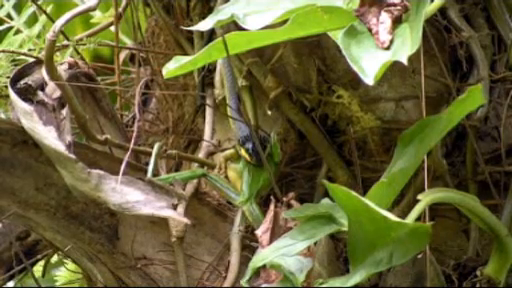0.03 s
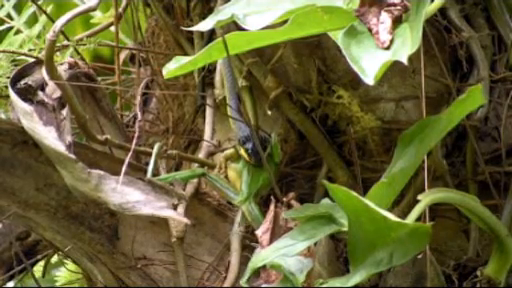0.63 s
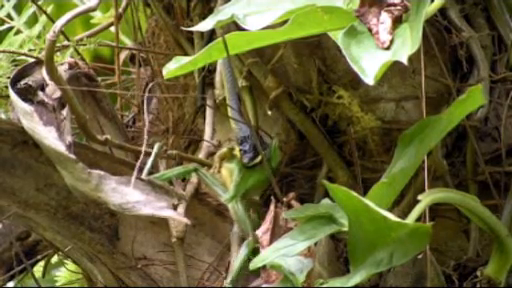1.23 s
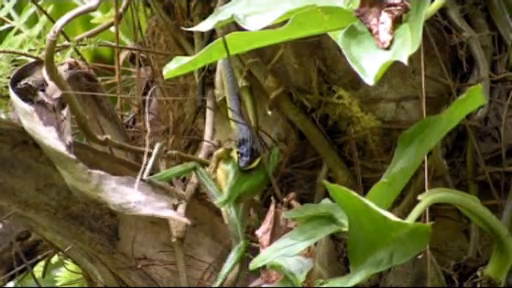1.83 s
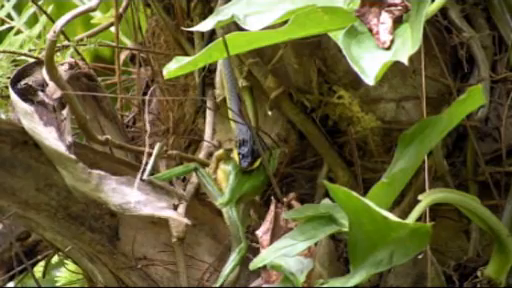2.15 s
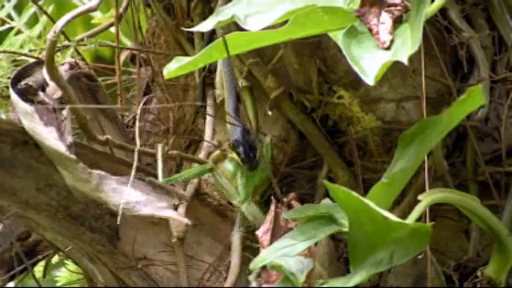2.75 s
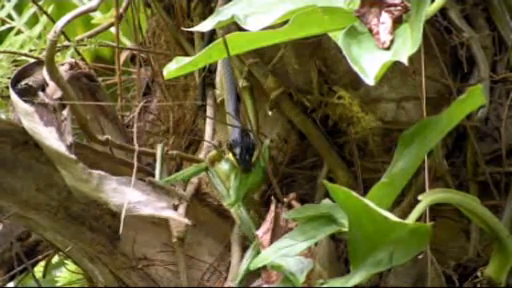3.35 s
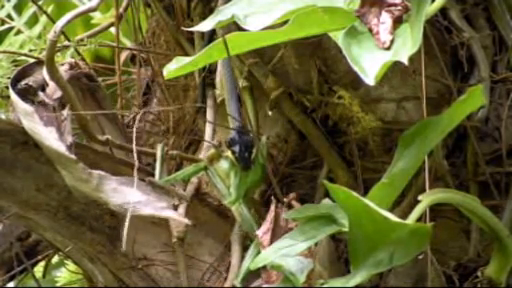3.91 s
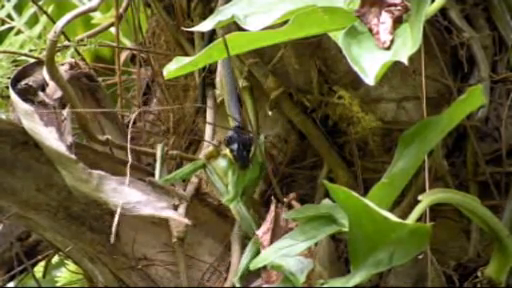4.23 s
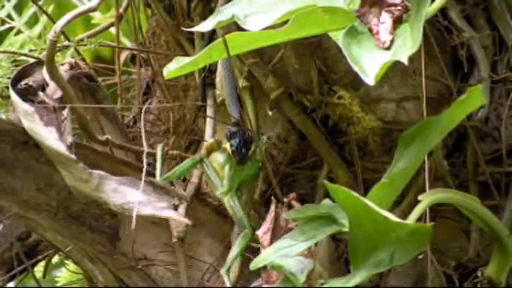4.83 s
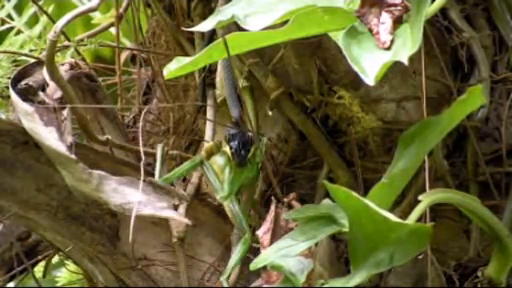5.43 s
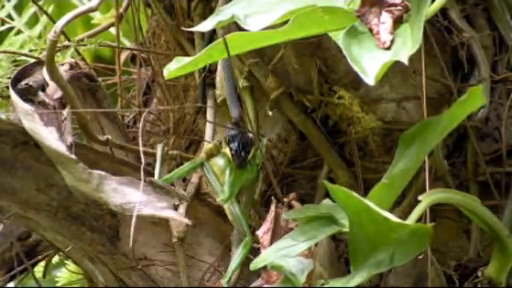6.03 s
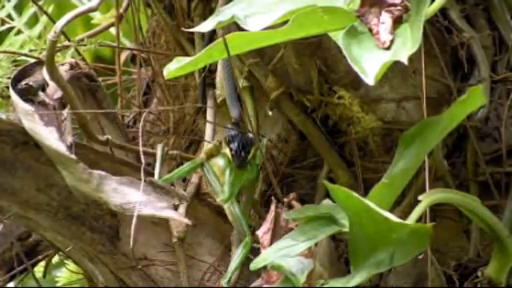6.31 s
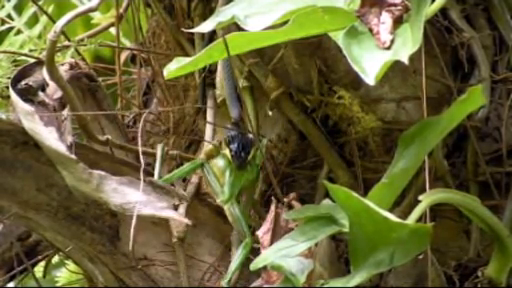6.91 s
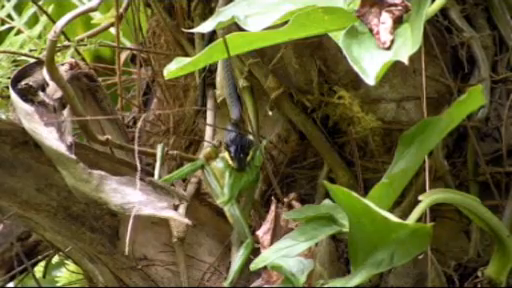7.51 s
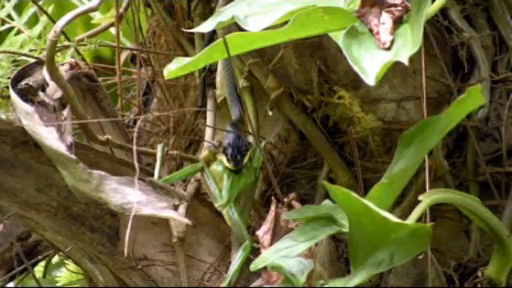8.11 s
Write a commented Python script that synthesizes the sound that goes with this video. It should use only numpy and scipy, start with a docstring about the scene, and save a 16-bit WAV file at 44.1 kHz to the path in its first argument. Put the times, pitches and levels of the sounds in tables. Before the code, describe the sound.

A small forest stream trickles over stones for the whole eight seconds, close by, with irregular bubbly plops above fine splashing and spray. It eases briefly just before 4 seconds. One bird holds a thin, high, slightly sinking whistle at the very start, again from about 3.1 to 3.9 seconds, and louder from 6.3 to 7.2. A second bird sings quick, bright rising chirps, mainly from 0.8 to 1.4 seconds and from 7.4 to 8. It also gives sharp falling whips at about 0.6, 1.8, 6 and 7.2 seconds, with softer, lower notes around them. Faint buzzy wheezes come near 1.7 and 6.4 seconds. The trees give the calls a short, diffuse echo. A smooth, high insect hiss sits in the background and fades after about 4.5 seconds, while a faint low rumble of air stays steady underneath.

```python
"""Forest stream with birds

A small stream trickles over stones: trapped air bubbles ring close by over fine splashing. Apart from it, a
faint flat hiss lies above 9 kHz. One bird holds long, slowly sinking whistles; another sings rising slurs and
sharp falling whips. Trunks and foliage scatter these calls and a few thin wheezes. Insect hiss fades over a low
air rumble."""
import sys
import numpy as np
from scipy import signal
from scipy.fft import rfft, irfft, next_fast_len
from scipy.io import wavfile
from scipy.ndimage import uniform_filter1d

SR = 44100
rng = np.random.default_rng(int(sys.argv[2]) if len(sys.argv) > 2 else 0)


def output_pcm(signal):
    """Save a mono or channel-first signal as 16-bit PCM at the path in sys.argv[1].

    Samples are clipped to [-1, 1] before scaling.
    """
    pcm = np.clip(np.atleast_2d(signal).T, -1, 1) * 32767
    wavfile.write(sys.argv[1], SR, np.round(pcm).astype(np.int16))


N = 359846
TIME_S = np.arange(N) / SR
LEFT_RIGHT = np.array([[1], [-1]])

# loudest, closest bubbles (time [s], pitch [Hz], level [dB], decay [cycles])
NEAR_BUBBLES = [(0.133, 596, -26, 3.4), (0.154, 850, -20.5, 2.8), (0.440, 686, -25.5, 2.6),
                (0.769, 1550, -26, 4), (0.968, 554, -25.5, 2.9), (1.021, 1290, -20, 1.7),
                (1.055, 716, -29, 5.5), (1.145, 631, -32.5, 11), (1.460, 950, -33, 4.5),
                (1.523, 638, -31.5, 17), (1.701, 735, -29, 10.4), (1.844, 590, -31, 4.3),
                (1.887, 765, -29, 4.8), (1.964, 660, -29.5, 4.8), (2.033, 1440, -25, 5.8),
                (2.092, 2560, -23.5, 6.3), (2.201, 1660, -26, 3.4), (2.249, 910, -15.5, 1.8),
                (2.262, 657, -29.5, 4.7), (2.289, 1720, -16, 2.3), (2.290, 344, -32.5, 4.9),
                (2.342, 700, -19.5, 1.9), (2.354, 1600, -23, 2.8), (2.437, 2040, -19.5, 2.8),
                (2.459, 713, -29.5, 8.8), (2.522, 840, -24, 2.6), (2.545, 815, -26.5, 5.2),
                (2.589, 1040, -28, 5), (2.679, 677, -27, 3.7), (2.775, 3380, -19.5, 6.1),
                (2.835, 600, -30.5, 9.8), (2.962, 2239, -28.5, 5), (3.037, 2700, -19, 2.7),
                (3.269, 970, -26.5, 7.6), (3.369, 2900, -14, 3.7), (3.371, 513, -28, 4.5),
                (3.468, 2500, -21.5, 6.1), (4.070, 1920, -19.5, 11), (4.235, 817, -29, 5.7),
                (4.272, 630, -30, 5.3), (4.288, 1950, -17.5, 2.3), (4.333, 2380, -20.5, 3.9),
                (4.440, 395, -36, 6.6), (4.498, 420, -34, 7.4), (4.623, 2000, -19.5, 1.2),
                (4.709, 3470, -21, 6.9), (4.735, 1450, -24, 3), (4.761, 2480, -24, 9.2),
                (4.851, 1540, -27.5, 11), (4.88, 1660, -25, 7.8), (4.921, 725, -30, 4.2),
                (5.034, 850, -21.5, 2.4), (5.051, 1125, -25.5, 7.8), (5.197, 813, -31, 16),
                (5.239, 1120, -28, 7), (5.291, 1490, -24, 3.4), (5.354, 3800, -21.5, 5),
                (5.401, 2670, -23, 4), (5.424, 1014, -26, 5), (5.549, 1940, -19, 4), (5.59, 700, -29, 5.8),
                (5.653, 800, -24.5, 5.2), (5.755, 1650, -25, 5.4), (5.803, 2560, -24, 4),
                (5.872, 3170, -15, 4), (5.914, 2080, -22.5, 3.3), (6.150, 769, -31, 15),
                (6.301, 477, -25.5, 3.9), (6.472, 2540, -29, 4.5), (6.526, 3500, -18.5, 5),
                (6.706, 2360, -22, 6.9), (6.747, 600, -33.5, 17), (6.79, 995, -27, 17),
                (6.798, 1290, -24, 5.5), (6.829, 1400, -24, 8.2), (6.836, 628, -29.5, 9.6),
                (6.891, 1490, -20, 4.3), (6.942, 2120, -21.5, 5), (7.143, 1200, -28, 4.8),
                (7.167, 2560, -21.5, 7.8), (7.200, 3180, -23, 7.9), (7.215, 1920, -24, 4),
                (7.236, 1560, -22, 10), (7.249, 3060, -14, 6), (7.300, 828, -24.5, 8.6),
                (7.382, 1960, -23, 4), (7.400, 2330, -23.5, 6), (7.41, 1550, -25, 8.9),
                (7.446, 600, -24.5, 3.9), (7.970, 1190, -27, 7.1)]
# gurgle strength (time [s], level [dB])
FLOW = [(0, -28), (.15, -35.5), (.5, -35), (.73, -36.5), (1.0, -33.5), (1.35, -37.5), (1.62, -33.5),
        (2.55, -36.5), (2.93, -40), (3.27, -32.5), (3.78, -45.5), (4.27, -35), (5.35, -38), (5.6, -33),
        (6.83, -35), (7.02, -37.5), (7.25, -37), (8.16, -33)]
# water and high hiss spectra (frequency [Hz], gain [dB])
TRICKLE_SPECTRUM = [(250, 9.5), (400, -5.5), (620, -0.5), (1000, 1), (1500, 0.5), (2500, -3), (3600, -3),
                    (5000, -16), (9000, 18)]
WASH_SPECTRUM = [(200, -8.5), (400, -10.5), (650, -8), (1300, -1.5), (2200, -1.5), (3400, -0.5),
                 (4600, -10), (6200, -8.5), (9000, -67), (15000, -48)]
HIGH_HISS_SPECTRUM = [(3000, -9), (6000, -60), (9000, 1.5), (11000, 1.5), (16000, 2)]
# side over mid of water, insects and air (frequency [Hz], gain [dB])
AMBIENT_WIDTH = [(50, -6.5), (170, -1.5), (380, -1.5), (700, -8), (1400, -11.5), (2400, -34), (4000, -77)]
# insect hiss (time [s], level [dB])
INSECT_LEVEL = [(0, -40.5), (4.6, -41), (6.1, -46), (7.6, -46.5), (8.16, -53)]
# insect and air spectra (frequency [Hz], gain [dB])
INSECT_SPECTRUM = [(5500, -60), (6300, 1), (6700, 11.5), (7400, 16), (8200, 14), (8500, -1.5), (9200, -63)]
RUMBLE_SPECTRUM = [(15, 3.5), (28, 3), (42, 1), (53, 5.5), (70, -1), (120, -3.5), (250, -8), (450, -13.5),
                   (1000, -21.5), (3000, -63)]
# sinking whistles (start [s], swell [s], fade onset [s], pitch [Hz], level [dB])
WHISTLES = [(-0.2, 0.36, 0.77, 3252, -31.5), (3.097, 0.35, 0.65, 3286, -32), (6.326, .6, 0.67, 3270, -27.5)]
# foliage scattering, strongest for short waves (frequency [Hz], gain [dB])
FOLIAGE_SPECTRUM = [(1700, -8), (2500, -5.5), (3200, -2), (4000, 0), (6500, 14.5)]
# side over mid of call echoes (frequency [Hz], gain [dB])
CALL_WIDTH = [(2100, 4), (3000, -68), (6000, -52)]
# rising slurs (start [s], length [s], first pitch [Hz], last pitch [Hz], level [dB])
SLURS = [(0.113, 0.055, 3200, 4280, -28.5), (0.827, 0.063, 2770, 4020, -17),
         (0.965, 0.075, 2047, 4410, -15), (1.136, .03, 2620, 2750, -27), (1.167, .024, 2817, 3060, -17.5),
         (1.272, 0.082, 1822, 4380, -22.5), (7.402, 0.086, 2620, 3810, -20), (7.552, .084, 1986, 4240, -14),
         (7.707, 0.084, 2460, 3180, -18.5), (7.857, 0.075, 1816, 4250, -17),
         (8.018, 0.044, 2450, 2730, -26)]
# low notes around the whips (start [s], length [s], first pitch [Hz], last pitch [Hz], level [dB])
SOFT_NOTES = [(0.439, 0.083, 2450, 1777, -24), (1.602, 0.23, 1410, 2024, -29.5),
              (1.86, 0.053, 1820, 1567, -24.5), (5.848, 0.19, 1670, 2040, -35),
              (6.072, 0.094, 1764, 1640, -30), (7.029, 0.1, 2450, 1734, -29)]
# falling whips (start [s], length [s], first pitch [Hz], level [dB])
WHIPS = [(0.633, 0.067, 6140, -21.5), (1.79, 0.06, 7490, -17.5), (6.008, .071, 7100, -20),
         (7.243, 0.037, 4950, -19.5)]
# drops on stone (start [s], length [s], level [dB])
SPATTERS = [(1.086, 0.12, -41), (2.242, 0.055, -37.5), (7.534, 0.027, -41)]
# thin buzzy notes (start [s], length [s], first pitch [Hz], last pitch [Hz], level [dB])
WHEEZES = [(1.67, 0.13, 6000, 5820, -38.5), (6.302, 0.23, 5910, 5810, -41), (6.396, 0.096, 5500, 5370, -37)]


def undb(db):
    """Decibels to gain."""
    return 10 ** (np.asarray(db) / 20)


def unit_rms(x):
    """Scale to rms 1."""
    return x / np.sqrt(np.mean(x ** 2))


def curve(rows):
    """Interpolate (time, value) rows per sample."""
    return np.interp(TIME_S, *np.transpose(rows))


def colour(x, spectrum):
    """Filter by (Hz, dB) points, joined in log frequency."""
    hz, db = np.transpose(spectrum)
    size = next_fast_len(N, True)
    bins_hz = np.maximum(np.fft.rfftfreq(size, 1 / SR), 1)
    gain = undb(np.interp(np.log(bins_hz), np.log(hz), db))
    return irfft(rfft(x, size) * gain, size)[..., :N]


def wander(rate_hz):
    """Random steps, smoothed twice; rms 1."""
    hold = int(SR / rate_hz)
    steps = np.repeat(rng.standard_normal(N // hold + 1), hold)
    return unit_rms(uniform_filter1d(uniform_filter1d(steps, hold), hold)[:N])


def noise(spectrum):
    """Coloured stereo noise: wide bass, narrow treble."""
    mid, side = colour(rng.standard_normal((2, N)), spectrum)
    return (mid + LEFT_RIGHT * colour(side, AMBIENT_WIDTH)) / np.std(mid)


def add(out, start_s, sound):
    """Mix in place."""
    start = int(np.clip(start_s * SR, 0, len(out)))
    out[start:start + len(sound)] += sound[:len(out) - start]


def scatter(x, t60_s, delay_s, late_db, late_t60_s, width):
    """Echoes off many small surfaces: a quick near cloud, a weaker far one."""
    age_s = np.maximum(TIME_S[:SR] - delay_s, 0)
    cloud = (undb(-60 * age_s / t60_s) + undb(late_db - 60 * age_s / late_t60_s)) * (age_s > 0)
    response = rng.standard_normal((2, SR)) * cloud / np.linalg.norm(cloud)
    mid, side = signal.fftconvolve(x[None], response, axes=1)[:, :N]
    return mid + LEFT_RIGHT * colour(side, width)


def bubble(hz, cycles, rise):
    """An air pocket pinches off, rings and climbs in pitch as it nears the surface."""
    turns = np.arange(int(2 * np.pi * cycles * SR / hz)) * hz / SR
    age = turns / cycles
    envelope = (1 - np.exp(-2 * turns)) * np.exp(-age)
    return envelope * np.sin(2 * np.pi * turns * (1 + rise * age / 2))


def plop(hz, db, cycles, draws, rise=0.0547, snap_hz=2000, trail_s=0.015):
    """A drop snaps on the surface and traps one bubble; a few weaker ones trail it."""
    out = np.zeros(SR // 4)
    steepness, snap_pitch = draws[0]
    add(out, 0, undb(db - 1) * bubble(snap_hz * (.5 + snap_pitch), cycles=.8, rise=0))
    add(out, 0, undb(db) * bubble(hz, cycles, rise * (.5 + steepness)))
    for lag, pitch in draws[1:]:
        trail_hz = np.sqrt(hz * 500 * 16 ** pitch)
        add(out, lag * trail_s, undb(db - 11) * bubble(trail_hz, cycles=1.95, rise=rise))
    return out


def near_plops(bubbles=4):
    """Single loud plops at the closest little fall."""
    out = np.zeros(N)
    for start_s, hz, db, cycles in NEAR_BUBBLES:
        add(out, start_s, plop(hz, db, cycles, rng.random((bubbles, 2))))
    return out


def gurgle(surge_db, plops_per_s=9, low_hz=540, high_hz=2600, base_db=-34, spread_db=4, db_per_octave=3):
    """Softer random plops, mostly low, stronger when the water surges."""
    out = np.zeros(N)
    for draws in rng.random((int(plops_per_s * N / SR), 5, 3)):
        when, pitch, strength = draws[0]
        octaves = np.log2(high_hz / low_hz) * pitch ** 1.317
        db = base_db + db_per_octave * octaves + spread_db * (strength - .5) + surge_db[int(when * N)]
        add(out, when * N / SR, plop(low_hz * 2 ** octaves, db, cycles=5, draws=draws[1:, :2]))
    return out


def trickle(splashes_per_s=100, bubbles=5, burst_s=.018, low_hz=330, high_hz=5400):
    """Each small splash traps bubbles of all sizes: most faint, a few strong."""
    out = np.zeros(N)
    for splash in rng.random((int(splashes_per_s * N / SR), bubbles + 1, 4)):
        when, splash_softness = splash[0, :2]
        for lag, pitch, softness, sustain in splash[1:]:
            hz = low_hz * (high_hz / low_hz) ** pitch
            db = -2 * np.log(max(splash_softness, .03)) - 1.5 * np.log(max(softness, .05))
            ring = bubble(hz, cycles=8.26 * (.5 + sustain), rise=0.0612)
            add(out, when * N / SR + lag * burst_s, undb(db) * hz / low_hz * ring)
    return unit_rms(colour(out, TRICKLE_SPECTRUM))


def stream(banks_db=-7, trickle_db=-5, wash_db=-41.5, high_hiss_db=-47):
    """Plops echo between stony banks, over trickle and distant wash; apart from these, a faint hiss flickers
    above 9 kHz."""
    flow_db = curve(FLOW)
    surge_db = 0.78 * (flow_db - flow_db.mean())
    plops = near_plops() + gurgle(surge_db)
    banks = scatter(plops, t60_s=.11, delay_s=.00194, late_db=-11, late_t60_s=.5, width=AMBIENT_WIDTH)
    patter = trickle() * undb(flow_db.mean() + surge_db + trickle_db)
    ripple_db = 1.1 * wander(35) + .9 * wander(12)
    wash = noise(WASH_SPECTRUM) * undb(wash_db + 0.34 * surge_db + ripple_db)
    flicker_db = 1.1 * wander(40) + 1.4 * wander(12)
    high_hiss = noise(HIGH_HISS_SPECTRUM) * undb(high_hiss_db + flicker_db)
    return plops + undb(banks_db) * banks + patter + wash + high_hiss


def insects():
    """Far insects merge into a smooth high band."""
    return noise(INSECT_SPECTRUM) * undb(curve(INSECT_LEVEL) + .5 * wander(17))


def air(level_db=-47):
    """Low, nearly steady rumble of air."""
    return noise(RUMBLE_SPECTRUM) * undb(level_db + .5 * wander(3.7))


def tone(hz):
    """Sine along a pitch track."""
    return np.sin(2 * np.pi * np.cumsum(hz) / SR)


def whistler(settle_s=.25, drop_s=.027, sharp_hz=48.6, sag_hz_per_s=100,
             swell_db=21, ease_db_per_s=10, fade_db_per_s=168, echo_s=.13, echo_db=-9, trees_db=-8):
    """A thin note enters sharp, swells, settles and sags; it beats against its echo off a slope."""
    out = np.zeros(N)
    flutter_db, waver_hz = 2.4 * wander(45), 6 * wander(45)
    for start_s, swell_s, fade_onset_s, pitch_hz, db in WHISTLES:
        age_s = np.clip(TIME_S - start_s, 0, 2)
        lead_in = .5 - .5 * np.tanh((age_s - settle_s) / drop_s)
        hz = pitch_hz + sharp_hz * lead_in - sag_hz_per_s * age_s + waver_hz
        arch_db = np.minimum(swell_db * (age_s / swell_s - 1), ease_db_per_s * (swell_s - age_s))
        fade_db = fade_db_per_s * np.maximum(age_s - fade_onset_s, 0)
        gate = uniform_filter1d(1. * (age_s > 0), size=800)
        out += gate * undb(db + arch_db - fade_db + flutter_db) * np.sqrt(2) * tone(hz)
    echo = np.zeros(N)
    add(echo, echo_s, out)
    return out + undb(echo_db) * echo + undb(trees_db) * trees(out)


def trees(call, trunk_gain=.14):
    """Near trunks roughen a call at once; foliage returns a diffuse tail."""
    trunks = scatter(call, t60_s=.11, delay_s=.002, late_db=-30, late_t60_s=.2, width=CALL_WIDTH)
    leaves = scatter(call, t60_s=.31, delay_s=.0049, late_db=-4, late_t60_s=1.03, width=CALL_WIDTH)
    return colour(leaves + trunk_gain * trunks, FOLIAGE_SPECTRUM)


def note(length_s, first_hz, last_hz, bend, crest, release=1):
    """Pure glide, loudest at fraction `crest`; bend > 0 glides late, release < 1 holds the end."""
    progress = np.linspace(0, 1, int(length_s * SR))
    glide = np.cumsum(np.exp(bend * progress))
    hz = first_hz * (last_hz / first_hz) ** (glide / glide[-1])
    crest = np.clip(crest, .1, .9)
    envelope = np.minimum(progress / crest, ((1 - progress) / (1 - crest)) ** release)
    return envelope * tone(hz)


def songbird(soft_attack_s=.02, direct_db=-4.5):
    """Slurs, soft low notes and whips; the trees smear each into a short hiss."""
    song = np.zeros(N)
    for start_s, length_s, first_hz, last_hz, db in SLURS:
        bend = 3.6 * (np.log2(last_hz / first_hz) - 0.253)  # wider slurs shoot up later
        add(song, start_s, undb(db) * note(length_s, first_hz, last_hz, bend, crest=.78, release=.39))
    for start_s, length_s, first_hz, last_hz, db in SOFT_NOTES:
        soft = note(length_s, first_hz, last_hz, bend=-19 * length_s, crest=soft_attack_s / length_s)
        add(song, start_s, undb(db) * soft)
    for start_s, length_s, first_hz, db in WHIPS:
        add(song, start_s, undb(db) * note(length_s, first_hz, last_hz=1732, bend=.54, crest=.63))
    return undb(direct_db) * song + trees(song)


def spatter():
    """Drops burst on stone into short puffs of spray."""
    envelope = np.zeros(N)
    for start_s, length_s, db in SPATTERS:
        add(envelope, start_s, undb(db) * np.hanning(int(length_s * SR)))
    return envelope * unit_rms(colour(rng.standard_normal(N), HIGH_HISS_SPECTRUM))


def wheezes(trees_db=-8):
    """Faint high notes; a fast, uneven pitch shake makes them buzz."""
    out = np.zeros(N)
    shake_hz = 75 * wander(500)
    for start_s, length_s, first_hz, last_hz, db in WHEEZES:
        progress = np.clip((TIME_S - start_s) / length_s, 0, 1)
        hz = first_hz + (last_hz - first_hz) * progress + shake_hz
        out += undb(db) * np.sqrt(4 * progress * (1 - progress)) * tone(hz)
    return out + undb(trees_db) * trees(out)


def scene():
    """Water, birds and forest, in stereo."""
    return stream() + songbird() + wheezes() + whistler() + insects() + air() + spatter()


def record(dry, cutoff_hz=15750):
    """Steep elliptic low-pass."""
    return signal.sosfilt(signal.ellip(10, .2, 80, cutoff_hz, fs=SR, output="sos"), dry)


dry = scene()
out = record(dry)
output_pcm(out)
```